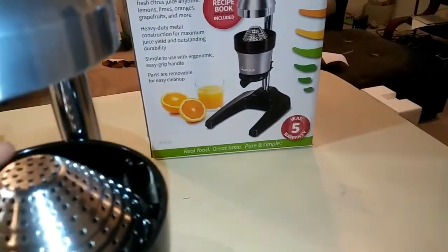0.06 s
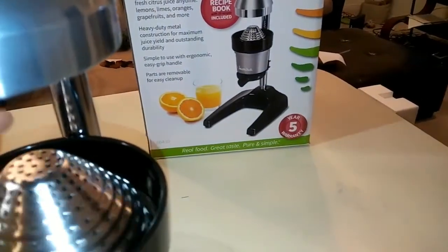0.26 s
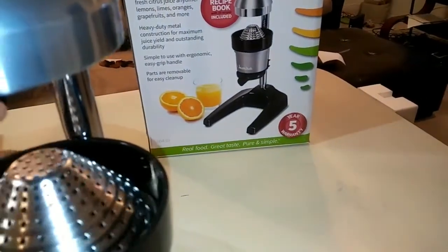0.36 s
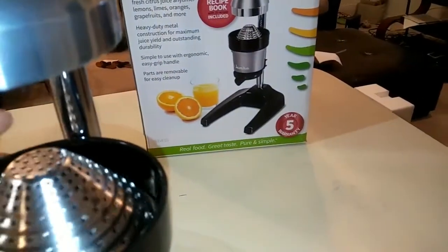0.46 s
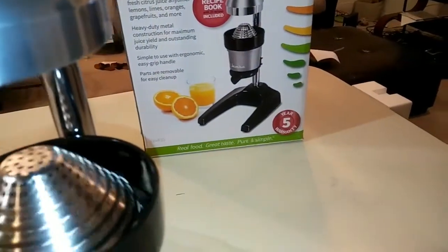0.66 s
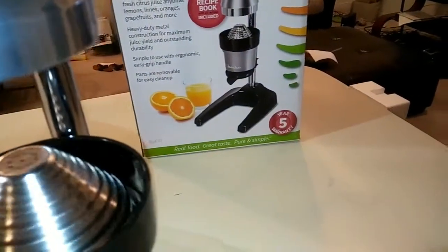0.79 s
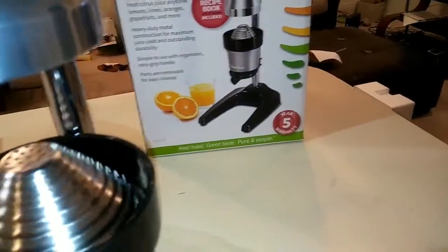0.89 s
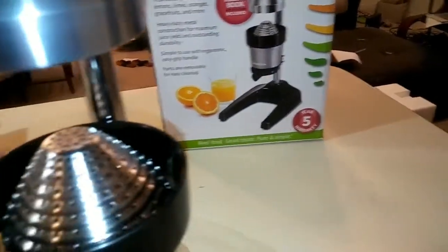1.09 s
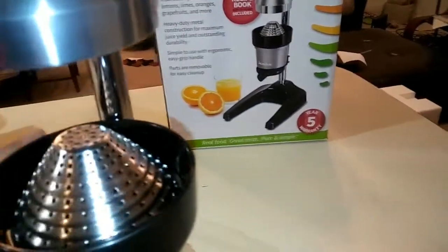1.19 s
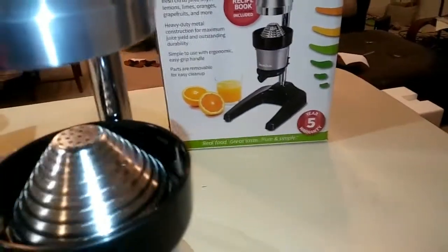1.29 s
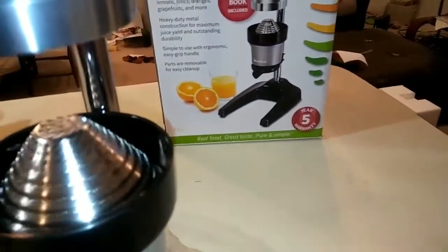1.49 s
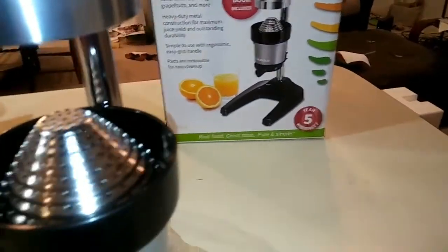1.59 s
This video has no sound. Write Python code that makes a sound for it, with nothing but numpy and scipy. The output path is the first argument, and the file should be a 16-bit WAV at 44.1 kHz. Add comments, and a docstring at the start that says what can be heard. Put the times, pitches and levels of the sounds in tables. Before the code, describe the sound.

A metal citrus press is handled close up on a table in a small room. Its loose parts clatter with a steel ring and the ram slides with a dry grind. After a pause come two clacks and another slide.

```python
"""A metal lever citrus press, handled close up on a table in a small room.
Its loose parts knock and rattle: each contact is a clunk with a steel ring, some with a hollow
clank or a ping on top. The ram slides along its post with a dry grind of tiny slips and hissing
grit, over the rumble of the base and a low groan. Faint tones hang in the pause, then the parts
clack twice and the ram slides again."""
import sys
import numpy as np
from scipy import signal
from scipy.fft import rfft, irfft, next_fast_len
from scipy.io import wavfile
from scipy.ndimage import uniform_filter1d, map_coordinates

SR = 44100
rng = np.random.default_rng(int(sys.argv[2]) if len(sys.argv) > 2 else 0)


def int16_out(signal):
    """Quantize to a 16-bit WAV file."""
    q = np.round(np.clip(np.atleast_2d(signal).T, -1, 1) * 32767)
    wavfile.write(sys.argv[1], SR, q.astype(np.int16))


N = 72765

# metal-on-metal hits: start_s, level_db, thud_db, brightness_db, hardness_db
KNOCKS = [(0.0981, -37.5, 2, -14.5, 0), (0.159, -31, 4, -22, -6), (0.2013, -22.5, 19, -37.5, -2.5),
          (0.2049, -18.5, 6, -5.5, -11), (0.214, -21.5, 9.5, -3, -5), (0.283, -15.5, -6, 3, 3),
          (0.2927, -15, -1.5, 2.5, 1.5), (0.3034, -19.5, -5, 9, -5.5), (.310, -16, 1, 7.5, 1),
          (0.3159, -14, 0.5, 8, -5.5), (0.3273, -8.5, -12, 1, 9), (.332, -11.5, 0.5, -1.5, 0.5),
          (0.344, -19.5, 14.5, 1, 4.5), (0.3911, -17, 4, 6, -4.5), (0.3983, -17, 14.5, -0.5, 1),
          (.7615, -36, -0.5, 23.5, -10.5), (1.1498, -14.5, 5, 16.5, -5.5), (1.1578, -14.5, 11.5, -2, 2.5),
          (1.1876, -15, 7.5, 11.5, -0.5), (1.202, -16, 11, -7.5, 5.5)]
# tone of a hit through the whole press: frequency_hz, level_db
CLUNK_EQ = [(60, -57), (100, -30), (155, -20.5), (280, -11.5), (520, -13), (750, -3.5), (1080, 4.5),
            (1500, -4.5), (1950, -5.5), (2400, -18), (2850, -13), (3500, -30), (4000, -17.5), (4600, -22.5),
            (6200, -20), (8000, -31), (10000, -35.5), (12500, -51.5), (15500, -46)]
# dense ring of the casting: frequency_hz, t60_s
CLATTER_DECAY = [(150, 0.22), (1000, .06), (3000, .055), (10000, 0.03)]
# modes of the steel cone, funnel and post: pitch_hz, level_db, t60_s
STEEL_MODES = [(299, -36.5, 0.6), (373, -16.5, 0.2), (710, -21.5, .15), (949, -12, 0.19), (1067, -1, .19),
               (1255, -1.5, 0.1), (1458, -31.5, .18), (1853, -14.5, 0.12), (2132, -31, .22),
               (2792, -36.5, 0.24), (3010, -36.5, .4), (3986, -31, 0.16), (4940, -41.5, 0.14),
               (5950, -39.5, 0.62), (9260, -52.5, .3)]
# the hollow funnel is struck and bounces: start_s, level_db, pitch_hz
FUNNEL_CLANKS = [(.2834, -10, 1330), (.3148, -13, 1130), (.353, -18, 1270), (1.1876, -5, 1150),
                 (1.1932, -8, 1100), (1.1988, -9, 1090)]
# single parts ping when touched: start_s, level_db, pitch_hz
PINGS = [(.3915, -19, 692.4), (1.1274, -39, 4680), (1.1518, -7.5, 5730), (1.3571, -29, 4630)]
# envelopes of the sliding ram: time_s, grind_db, hiss_db
SLIDE_LEVELS = [(.075, -86, -86), (.1, -51, -89), (.27, -62, -58), (.525, -50, -62), (.598, -51, -61),
                (.648, -39.5, -52.5), (.722, -32.5, -44), (.778, -36, -51.5), (.83, -37.5, -56.5),
                (.90, -43, -65.5), (.96, -52.5, -77), (1.0, -63.5, -100), (1.125, -79, -85),
                (1.144, -35, -59), (1.24, -44.5, -54), (1.29, -36, -53), (1.333, -26.5, -49),
                (1.349, -42, -44.5), (1.366, -31.5, -54.5), (1.415, -34, -53.5), (1.447, -40, -60),
                (1.485, -42.5, -58), (1.55, -59.5, -66.5), (1.61, -81, -100)]
# resonances of ram and post: pitch_hz, width_hz, level_db
RUB_MODES = [(831.4, 47, -2), (1023.5, 61.5, 7), (1192, 110, -3.5)]
# tone of the fine grit: frequency_hz, level_db
HISS_EQ = [(2200, -14.5), (2900, 1), (3600, -14.5), (4000, -0.5), (4500, -7.5), (6100, -1), (7500, -9),
           (10000, -20.5), (12500, -45), (14800, -49.5)]
# the ram catches and jumps: start_s, level_db
RAM_CATCHES = [(.718, -19), (1.31, -24.5), (1.32, -24), (1.3337, -18), (1.457, -26.5)]
# envelope shared by the base's rumble and the post's groan: time_s, level_db
RUMBLE_LEVELS = [(.075, -88), (.1, -53.5), (.2, -48.5), (.42, -45), (.52, -63), (.6, -92), (.72, -49.5),
                 (.8, -53.5), (.93, -56.5), (1.0, -72.5), (1.12, -83.5), (1.24, -47.5), (1.38, -58),
                 (1.48, -46.5), (1.61, -88)]
# tone of the base on the table: frequency_hz, level_db
BASE_EQ = [(60, -31), (92, -8.5), (125, -26.5), (250, 0.5), (420, -5), (700, -13), (4000, -48.5)]
# low resonance of the post, gliding as the ram travels: time_s, pitch_hz
GROAN_GLIDE = [(.1, 295), (.74, 265), (.88, 350), (.95, 440), (1.2, 300)]
# faint tones in the pause: start_s, pitch_hz, level_db, t60_s, flutter_depth
HANGING_TONES = [(.962, 205, -46, .65, .3), (.968, 88, -54, 1.0, .6), (.89, 1663, -56, 2.5, 0)]
# tone of skin on metal: frequency_hz, level_db
GRIP_EQ = [(900, -12), (1800, -3.5), (3600, 1), (4100, -53)]
# reverb of the small room: frequency_hz, t60_s
ROOM_DECAY = [(100, 0.15), (300, 0.85), (1000, 0.38), (5000, 0.47), (14000, 0.12)]
# faint noise floor: frequency_hz, level_db
FLOOR_EQ = [(50, -18), (90, 3.5), (140, -8.5), (1000, -28.5), (3000, -43.5), (15000, -50.5)]

THUD_HZ, BRIGHT_HZ = 376, 3000  # corners of each knock's low and high shelf
CLATTER_DB, RING_DB, RING_RISE_S = 3, -13.5, .00092
CLANK_T60_S, CLANK_UPPER_RATIO, CLANK_UPPER_DB = .022, 1.7, -14
PING_CYCLES, PING_JITTER_RAD, STRIKE_RISE_S = 52, .16, .00009
SLIPS_PER_S, SLIP_SPREAD_DB, GRIT_PER_S, GRIT_SPREAD_DB = 900, 1, 12000, 3.5
RUB_BED_DB, RUB_BED_CUTOFF_HZ = -7, 1350  # broad layer under the rub's resonances
OVERTONE_DB, OVERTONE_Q, OVERTONES_FROM_HZ = 5.5, 50, 1400
RIPPLE_DB, RIPPLE_GAP_HZ, RIPPLE_FROM_HZ = 3.5, 130.2, 4500
GROAN_DB, FLUTTER_HZ = -2, 12  # groan level is relative to the rumble
GRIP_START_S, GRIP_FADE_S, GRIP_DB = .075, .2, -59
ROOM_DB, ROOM_DELAY_S, FLOOR_DB = -15, .006, -77.5
GATE_OPEN_S, GATE_CLOSE_S, LOW_CUT_HZ, HIGH_CUT_HZ = .075, 1.617, 60, 16000


def knocks():
    """Each contact is a sharp blow, a short dense clatter and the ring of the steel parts."""
    out, t = np.zeros(N), np.arange(SR * 2 // 3) / SR
    clunk_peak = np.abs(impulse_response(lambda hz: along(CLUNK_EQ, hz))).max()
    for start_s, level_db, thud_db, bright_db, hardness_db in KNOCKS:
        def shelves_db(hz):
            thud = thud_db / (1 + (hz / THUD_HZ) ** 2)
            return thud + bright_db * (1 - 1 / (1 + (hz / BRIGHT_HZ) ** 4))

        force = amp(CLATTER_DB) * noise_tail(CLATTER_DECAY)
        force[0] += amp(hardness_db)  # the first blow
        clunk = impulse_response(lambda hz: along(CLUNK_EQ, hz) + shelves_db(hz)) / clunk_peak
        add(out, start_s, amp(level_db) * signal.fftconvolve(force, clunk))
        ring = np.zeros(len(t))
        for hz, mode_db, t60_s in STEEL_MODES:
            gain = amp(mode_db + rng.normal(0, 1.8) + shelves_db(hz) / 2)
            phase = 2 * np.pi * (hz * t + rng.random())
            ring += gain * np.sin(phase) * envelope(t, RING_RISE_S, t60_s)
        add(out, start_s, amp(level_db + RING_DB) * ring)
    return out


def funnel_clanks():
    """Each blow on the funnel gives a short hollow note of two modes."""
    out, t = np.zeros(N), np.arange(N) / SR
    for start_s, level_db, hz in FUNNEL_CLANKS:
        phase = 2 * np.pi * hz * t
        note = np.sin(phase) + amp(CLANK_UPPER_DB) * np.sin(CLANK_UPPER_RATIO * phase)
        add(out, start_s, amp(level_db) * note * envelope(t, STRIKE_RISE_S, CLANK_T60_S))
    return out


def pings():
    """One part rings briefly at its own pitch; higher parts die sooner."""
    out, t = np.zeros(N), np.arange(N) / SR
    for start_s, level_db, hz in PINGS:
        ring = np.sin(2 * np.pi * hz * t + PING_JITTER_RAD * flutter(hz / 10))
        add(out, start_s, amp(level_db) * ring * envelope(t, STRIKE_RISE_S, PING_CYCLES / hz))
    return out


def ram_slide():
    """Uneven slips ring the post; fine grit hisses; now and then the ram catches."""
    grind_db, hiss_db = automation(SLIDE_LEVELS)
    slips = unit(filtered(grains(SLIPS_PER_S, SLIP_SPREAD_DB), rub_response))
    grit = grains(GRIT_PER_S, GRIT_SPREAD_DB)
    bed = filtered(grit, lambda hz: 1 / (1 + (hz / RUB_BED_CUTOFF_HZ) ** 2))
    grind = slips + amp(RUB_BED_DB) * coloured(bed, CLUNK_EQ)
    hiss = coloured(grains(GRIT_PER_S, GRIT_SPREAD_DB), HISS_EQ)
    out = amp(grind_db) * grind + amp(hiss_db) * hiss
    jump = filtered(np.ones(1), rub_response)
    for start_s, level_db in RAM_CATCHES:
        add(out, start_s, amp(level_db) * jump / np.abs(jump).max())
    return out


def rub_response(hz):
    """Ram and post resonate as band-passes of alternating polarity."""
    return sum((-1) ** k * amp(db) * 1j * hz * width / (pitch ** 2 - hz ** 2 + 1j * hz * width)
               for k, (pitch, width, db) in enumerate(RUB_MODES))


def steel_overtones(x):
    """The metal lifts narrow bands at its upper modes; countless small ones ripple the top end."""
    bumps = rng.standard_normal(1024)

    def eq_db(hz):
        peaks = sum(1 / (1 + (2 * OVERTONE_Q * (hz / pitch - 1)) ** 2)
                    for pitch, _, _ in STEEL_MODES if pitch > OVERTONES_FROM_HZ)
        ripple = map_coordinates(bumps, [hz / RIPPLE_GAP_HZ], mode="mirror")
        top_end = hz ** 4 / (hz ** 4 + RIPPLE_FROM_HZ ** 4)
        return OVERTONE_DB * peaks + RIPPLE_DB * ripple * top_end

    return signal.fftconvolve(x, impulse_response(eq_db))[:N]


def rumble_and_groan():
    """The base rumbles on the table and the post groans: a narrow noise band gliding in pitch."""
    (level_db,), (groan_hz,) = automation(RUMBLE_LEVELS), automation(GROAN_GLIDE)
    carrier = np.exp(2j * np.pi * np.cumsum(groan_hz) / SR)
    groan = unit(np.real(signal.hilbert(flutter(FLUTTER_HZ)) * carrier))
    rumble = coloured(rng.standard_normal(N), BASE_EQ)
    return amp(level_db) * (rumble + amp(GROAN_DB) * groan)


def hanging_tones():
    """Faint tones hang on while the ram rests; the low ones waver in level."""
    out, t = np.zeros(N), np.arange(N) / SR
    for start_s, hz, level_db, t60_s, depth in HANGING_TONES:
        tone = np.sin(2 * np.pi * hz * t) * (1 + depth * flutter(FLUTTER_HZ))
        add(out, start_s, amp(level_db) * tone * envelope(t, rise_s=.025, t60_s=t60_s))
    return out


def hand_grip():
    """Skin brushes the metal as the hand takes hold, and the rustle fades."""
    out, t = np.zeros(N), np.arange(N) / SR
    rustle = coloured(rng.standard_normal(N), GRIP_EQ)
    add(out, GRIP_START_S, amp(GRIP_DB) * rustle * np.exp(-(t / GRIP_FADE_S) ** 2))
    return out


def room(press):
    """The small room answers with a short reverb over a faint noise floor."""
    out = amp(FLOOR_DB) * coloured(rng.standard_normal(N), FLOOR_EQ)
    add(out, ROOM_DELAY_S, amp(ROOM_DB) * signal.fftconvolve(press, noise_tail(ROOM_DECAY)))
    return out


def amp(db):
    return 10 ** (np.asarray(db) / 20)


def unit(x):
    """x at rms 1."""
    return x / np.sqrt(np.mean(x ** 2) + 1e-20)


def along(points, hz):
    """Read (frequency_hz, value) points on a log frequency axis."""
    frequencies, values = np.transpose(points)
    return np.interp(np.log(hz + 1), np.log(frequencies + 1), values)


def automation(rows):
    """One value per sample for each column after the time."""
    times, *columns = np.transpose(rows)
    return [np.interp(np.arange(N) / SR, times, column) for column in columns]


def filtered(x, response):
    """x through a complex frequency response."""
    size = next_fast_len(N + SR // 2)
    return irfft(rfft(x, size) * response(np.fft.rfftfreq(size, 1 / SR)), size)[:N]


def coloured(x, eq):
    """x through an EQ curve, at rms 1."""
    return unit(filtered(x, lambda hz: amp(along(eq, hz))))


def impulse_response(db_of_hz, size=4096):
    """The minimum-phase click that has this spectrum."""
    cepstrum = irfft(np.log(amp(db_of_hz(np.fft.rfftfreq(size, 1 / SR)))))
    cepstrum[1:size // 2] *= 2
    cepstrum[size // 2 + 1:] = 0
    return irfft(np.exp(rfft(cepstrum)))


def noise_tail(decay):
    """Noise whose bands each die at their own speed, energy 1."""
    hz, t, bands = signal.stft(rng.standard_normal(SR * 2 // 3), SR, nperseg=128)
    fade = amp(-60 * t / along(decay, hz)[:, None])
    tail = signal.istft(bands * fade, SR, nperseg=128)[1]
    return tail / np.linalg.norm(tail)


def envelope(t, rise_s, t60_s):
    """A rounded attack and a decay of 60 dB per t60_s."""
    return (1 - np.exp(-t / rise_s)) * amp(-60 * t / t60_s)


def grains(per_s, spread_db):
    """Random tiny impulses of scattered size."""
    clicks = (rng.random(N) < per_s / SR) * rng.choice([-1, 1], N)
    return clicks * amp(spread_db * np.clip(rng.standard_normal(N), -2, 2))


def flutter(width_hz):
    """Slow noise of rms 1, rolling off around width_hz."""
    return unit(filtered(rng.standard_normal(N), lambda hz: np.exp(-(hz / width_hz) ** 2)))


def add(out, start_s, x):
    """Mix x into out at start_s."""
    i = round(start_s * SR)
    out[i:i + len(x)] += x[:N - i]


def scene():
    """All layers of the press and the room around it, in mono."""
    metal = steel_overtones(knocks() + ram_slide()) + funnel_clanks() + pings()
    press = metal + rumble_and_groan() + hanging_tones() + hand_grip()
    return (press + room(press))[None]


def record(dry):
    """Both ends fall silent with a soft fade; the microphone drops the deep bass and the very top."""
    t = np.arange(N) / SR
    gate = uniform_filter1d(1.0 * ((t > GATE_OPEN_S) & (t < GATE_CLOSE_S)), size=128)
    microphone = lambda hz: (hz < HIGH_CUT_HZ) * hz ** 2 / np.hypot(hz ** 2, LOW_CUT_HZ ** 2)
    return filtered(dry[0] * gate, microphone)[None]


dry = scene()
out = record(dry)
int16_out(out)
```